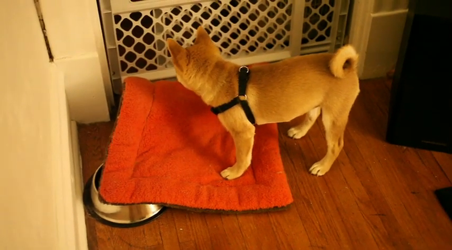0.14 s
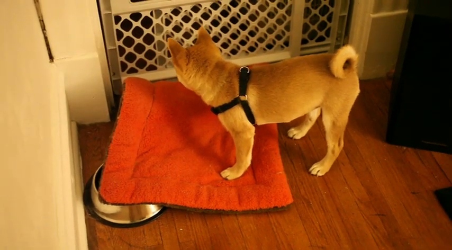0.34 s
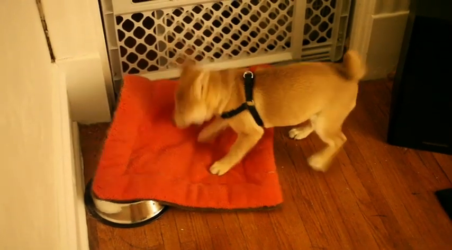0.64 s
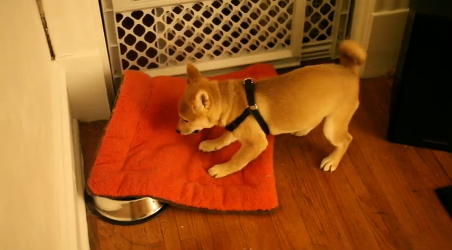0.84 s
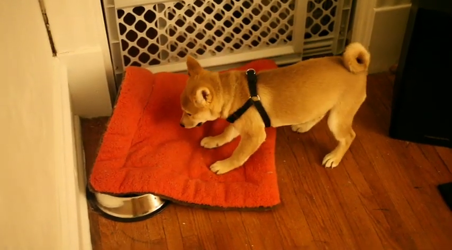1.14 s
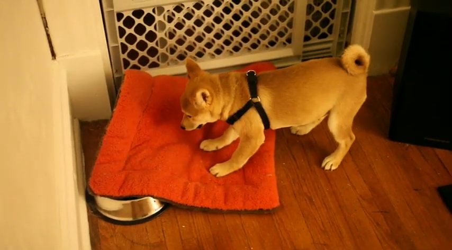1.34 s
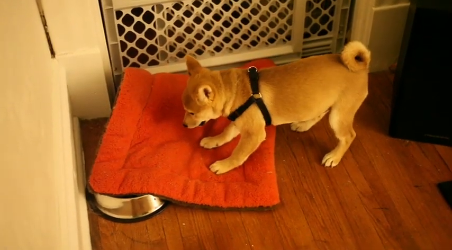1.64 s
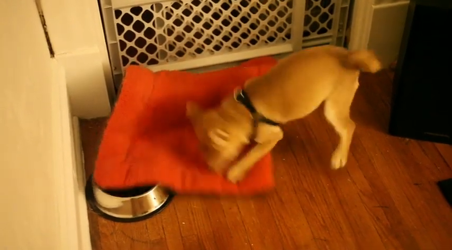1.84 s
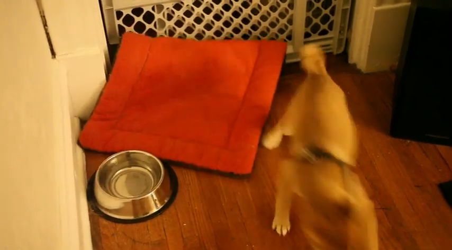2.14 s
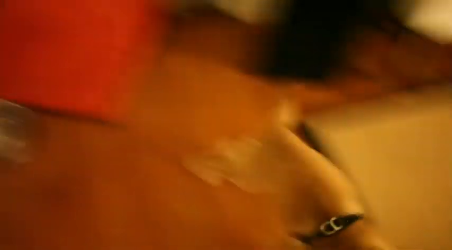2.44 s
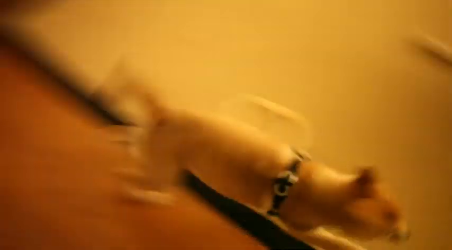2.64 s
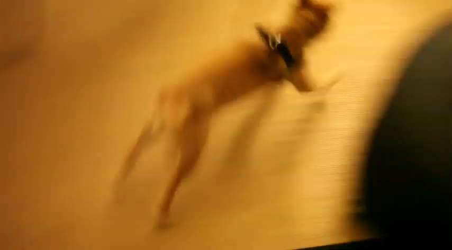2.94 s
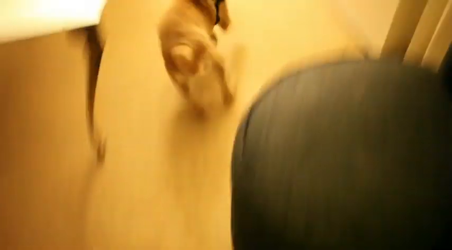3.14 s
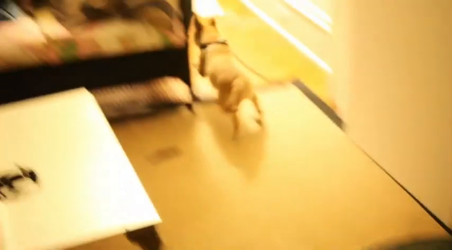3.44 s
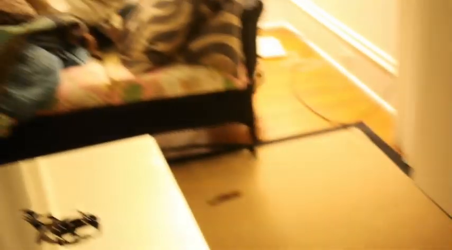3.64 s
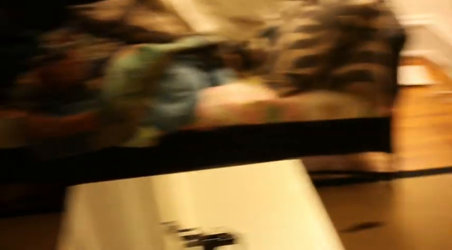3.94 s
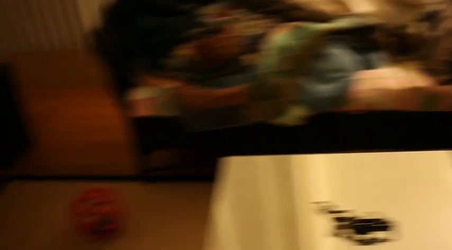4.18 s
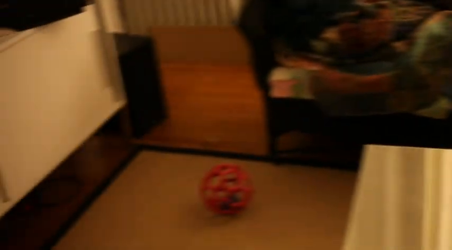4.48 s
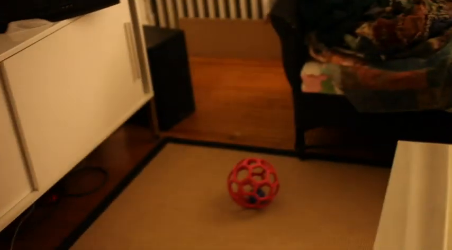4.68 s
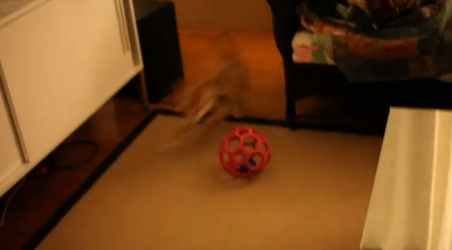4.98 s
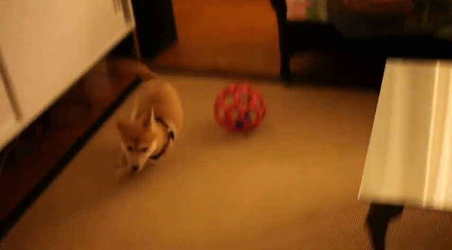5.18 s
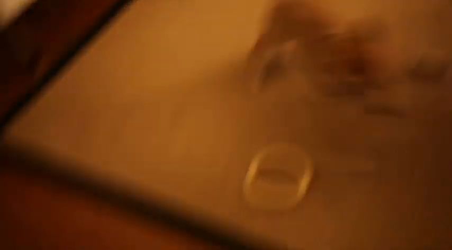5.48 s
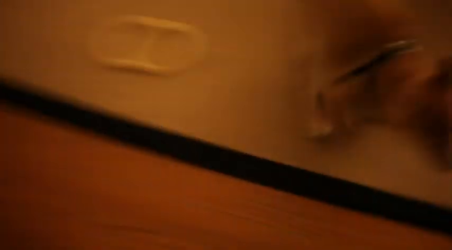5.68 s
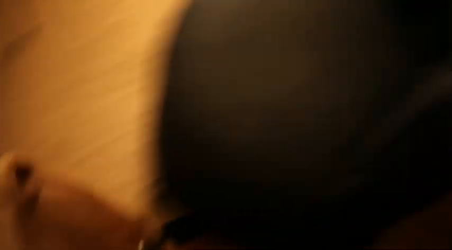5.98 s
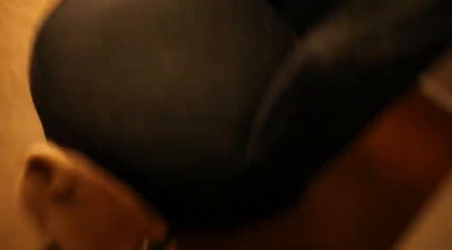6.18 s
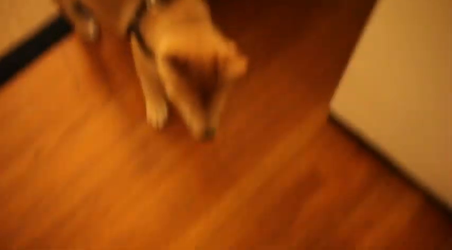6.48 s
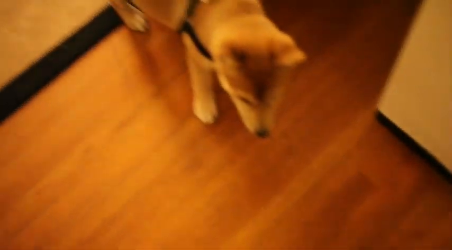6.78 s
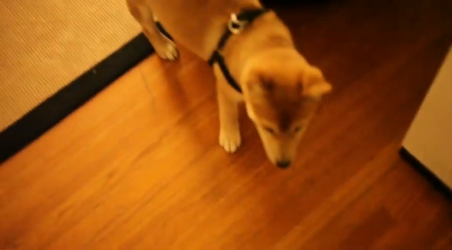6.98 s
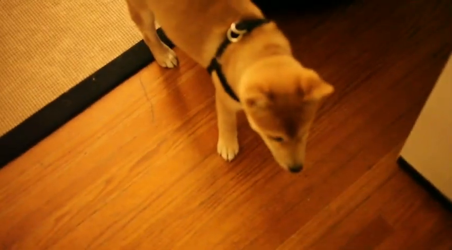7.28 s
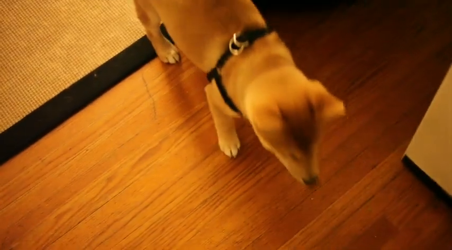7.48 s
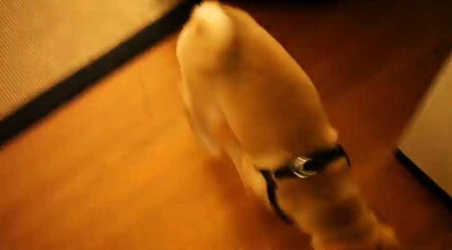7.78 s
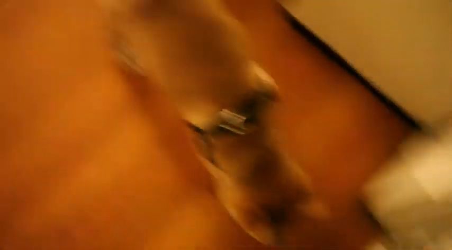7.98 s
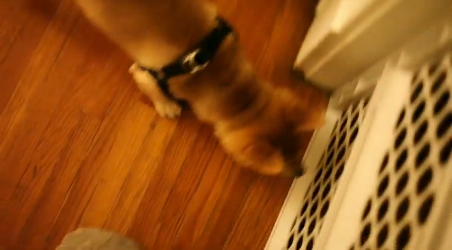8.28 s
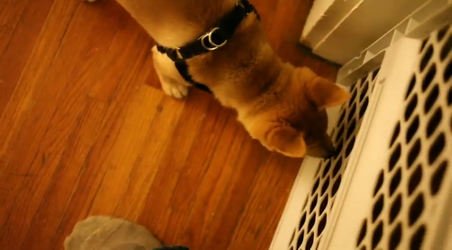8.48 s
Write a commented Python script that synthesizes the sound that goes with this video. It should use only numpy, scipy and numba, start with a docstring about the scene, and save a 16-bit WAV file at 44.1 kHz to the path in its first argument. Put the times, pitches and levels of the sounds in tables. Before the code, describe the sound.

A puppy whimpers faintly, yaps sharply twice, then tears around a small room with claws ticking, skidding and paws thumping, ending in a short snort.

```python
"""Puppy zoomies indoors

A puppy whimpers, yaps twice on its fleece bed, then bolts round a small room near a hand-held camera.
Claws tick as bursts of tiny contacts, paws ring low board modes; skids, hands and rustle are gritty noise.
Yaps are pulsed and noisy folds through moving mouth resonances; a late snort at a gate is air through the nostrils.
Dry jolts shake the camera; eight delay lines answer as walls, over room tone and circuit hiss with thin whines."""
import sys
import numpy as np
from scipy import signal
from scipy.fft import rfft, irfft, next_fast_len
from scipy.io import wavfile
from scipy.ndimage import uniform_filter1d
from numba import njit

SR = 44100
rng = np.random.default_rng(int(sys.argv[2]) if len(sys.argv) > 2 else 0)


def generate_wav(sig):
    """Save sig (samples, or channels by samples) to the path in sys.argv[1] as 16-bit PCM at SR."""
    pcm = np.round(np.clip(np.atleast_2d(sig).T, -1, 1) * 32767).astype(np.int16)
    wavfile.write(sys.argv[1], SR, pcm)


def invert_db(level):
    """Linear amplitude ratio for a level in decibels (20 dB per decade), elementwise."""
    return 10 ** (np.asarray(level, dtype=float) / 20)


N = 380141
TIME = np.arange(N) / SR


def curve(table, off_db=-120):
    """Columns of a table at every sample; off_db outside its time span."""
    s, *columns = np.transpose(table)
    return [np.interp(TIME, s, c, off_db, off_db) for c in columns]


def unit(x):
    """Scale to rms 1."""
    return x / np.sqrt(np.mean(x ** 2))


def colour(x, table):
    """Shape a noise by (Hz, dB) points, then scale to rms 1."""
    hz, db = np.transpose(table)
    size = next_fast_len(N)
    bin_hz = np.arange(size // 2 + 1) * SR / size
    gain = invert_db(np.interp(np.log(bin_hz + 1), np.log(hz), db))
    return unit(irfft(rfft(x, size) * gain, size)[:N])


def band(x, hz, width_hz):
    """A resonance, gain 1 at its centre."""
    return signal.lfilter(*signal.iirpeak(min(hz, .4 * SR), hz / width_hz, SR), x)


@njit
def glide(x, hz, width_hz):
    """A resonance whose centre moves every sample, gain 1 at the centre."""
    y, b, l = np.empty(len(x)), 0., 0.
    for i in range(len(x)):
        g, k = np.tan(np.pi * hz[i] / SR), width_hz / hz[i]
        v = (b + g * (x[i] - l)) / (1 + g * (g + k))
        b, l, y[i] = 2 * v - b, l + 2 * g * v, k * v
    return y


def walk(rate_hz):
    """Random levels held 1 / rate_hz and slewed twice; rms 1."""
    hold = int(SR / rate_hz)
    steps = np.repeat(rng.standard_normal(N // hold + 1), hold)
    return unit(uniform_filter1d(uniform_filter1d(steps, hold), hold)[:N])


def grit(size, spread_db):
    """Dense micro-slips: most small, a few large."""
    return rng.standard_normal(size) * 10 ** (spread_db * np.minimum(rng.exponential(size=size), 7.0) / 20)


def add(out, s, sound):
    """Mix a short sound in at time s."""
    i = int(s * SR)
    out[i:i + len(sound)] += sound[:N - i]


# Hiss and whine level. Each row: time in seconds, level in dB.
HISS_LEVEL = [(0, -63.5), (.6, -61.5), (.66, -71), (1.15, -83.5), (1.7, -72), (1.76, -99.5), (4, -82),
              (6.4, -56.5), (8.62, -57)]
# Hiss spectrum. Each row: frequency in Hz, relative density in dB per Hz.
HISS_SPECTRUM = [(15, -30.5), (25, -2.5), (100, -6), (153, -3.5), (531, -14), (4140, -19), (6920, -20),
                 (16000, -30.5)]
# Thin whines. Each row: frequency in Hz, level in dB relative to the hiss.
WHINES = [(6837, -15), (8791, -23), (9765, -19)]


def hiss():
    """Room tone and circuit hiss with a few thin whines, sinking after each yap and creeping back."""
    whine = sum(invert_db(db) * np.sqrt(2) * np.sin(2 * np.pi * hz * TIME) for hz, db in WHINES)
    noise = colour(rng.standard_normal(N), HISS_SPECTRUM)
    return (noise + whine) * invert_db(curve(HISS_LEVEL, off_db=-60)[0])


# Skids, and from 7.3 to 7.5 s short gritty rasps of hands on the camera. Each row: loudest moment in seconds,
# rasp in dB before a common trim, swell in seconds per 20 dB, fade in seconds per 20 dB,
# scuff in dB relative to that rasp.
RUB_STROKES = [(0.636, -33, 0.065, 0.14, -34), (1.982, -38, 0.032, 0.088, -8),
               (2.208, -42.5, 0.12, 0.3, -3.5), (2.369, -31.5, 0.013, 0.092, -46),
               (2.458, -34, 0.014, 0.09, -15), (2.535, -33.5, 0.087, 0.16, -41),
               (2.712, -26.5, 0.075, 0.12, -12), (2.835, -41.5, 0.025, 0.047, 3.5),
               (2.914, -41, 0.015, 0.1, 4), (3.09, -47, 0.052, 0.28, 4.5), (3.355, -42.5, 0.21, 0.1, 4),
               (3.547, -37.5, 0.062, 1, -6), (3.697, -25, 0.034, 0.16, -11.5),
               (3.85, -34.5, 0.083, 0.37, -34), (4.007, -25, 0.0047, 0.28, -6.5),
               (4.238, -22.5, 0.0049, 0.12, -17), (4.283, -23.5, 0.007, 0.16, -17),
               (4.344, -21.5, 0.011, 0.1, -7), (4.409, -45.5, 0.2, 0.37, 17),
               (4.491, -23.5, 0.027, 0.16, -23), (4.559, -16, 0.026, 0.12, -20),
               (4.722, -28, 0.024, 0.11, -14), (4.82, -26, 0.077, 0.15, -28),
               (4.959, -36.5, 0.35, 0.19, -0.5), (5.195, -36.5, 0.024, 0.13, -3),
               (5.311, -32, 0.16, 0.11, 9), (5.423, -31, 0.066, 0.033, 3), (5.493, -32, 0.048, 0.28, 2),
               (5.76, -32, 0.03, 0.049, 4.5), (5.96, -19, 0.18, 0.14, -6.5), (6.206, -33.5, 0.1, 0.18, -9),
               (7.305, -22, 0.012, 0.025, -3.5), (7.336, -22, 0.012, 0.017, -10),
               (7.38, -25, 0.012, 0.019, -7), (7.482, -28, 0.018, 0.048, -6),
               (7.53, -33.5, 0.093, 0.134, -1), (7.619, -33.5, 0.28, .07, -7),
               (7.732, -29, 0.017, 0.15, -9), (7.983, -33, 0.081, 0.094, -5.5),
               (8.281, -33.5, 0.068, 0.2, -0.5), (8.458, -39.5, 0.39, 0.095, -3)]
# Steady rustle of coat and harness. Each row: time in seconds, level in dB before the same trim.
RUSTLE_LEVEL = [(1.95, -48), (3.3, -53.5), (4.5, -37), (5.15, -81), (6.1, -48.5), (6.5, -54), (7.25, -63),
                (7.35, -40.5), (8.1, -59), (8.5, -40), (8.62, -72.5)]
RUSTLE_DULL_DB = -5.5  # scuff relative to rasp


def strokes():
    """Rasp and scuff levels over time: every stroke swells and fades through 40 dB, on top of the rustle."""
    rasp_power = invert_db(curve(RUSTLE_LEVEL)[0]) ** 2
    scuff_power = rasp_power * invert_db(RUSTLE_DULL_DB) ** 2
    for s, db, swell_s, fade_s, dull_db in RUB_STROKES:
        t = np.arange(-2 * swell_s, 2 * fade_s, 1 / SR)
        power = invert_db(db - 20 * np.maximum(-t / swell_s, t / fade_s)) ** 2
        add(rasp_power, s - 2 * swell_s, power)
        add(scuff_power, s - 2 * swell_s, power * invert_db(dull_db) ** 2)
    return np.sqrt(rasp_power), np.sqrt(scuff_power)


def catches(rate_hz, fade_s):
    """Rubbing catches at random: the level jumps up and dies away; in dB about its mean."""
    hits = (rng.random(N) < rate_hz / SR) * np.minimum(rng.exponential(size=N), 1.6)
    level = signal.lfilter([1], [1, -np.exp(-1 / (fade_s * SR))], hits) + 0.24
    level_db = 20 * np.log10(uniform_filter1d(level, size=40))
    return level_db - level_db.mean()


# Rasp spectrum. Each row: frequency in Hz, relative density in dB per Hz.
RASP_SPECTRUM = [(1410, -16), (2400, -9.5), (3740, 3.5), (4460, 5.5), (5520, -2), (6630, 0.5), (9630, -6),
                 (16000, -36.5)]
# Scuff spectrum. Each row: frequency in Hz, relative density in dB per Hz.
SCUFF_SPECTRUM = [(240, -67), (400, -6), (1170, -2), (1860, -2.5), (2230, -4), (3050, 4), (3600, -2.5),
                  (4500, -0.5), (7920, -47)]
# Fine crackle in the top treble, strongest around 0.6 and 7.4 s, weak in between.
# Each row: time in seconds, level in dB relative to the rasp.
TOP_CRACKLE = [(.6, -10.5), (2.3, -23), (5.3, -39), (6.3, -32), (7.4, -4), (8.3, -52.5)]


def scrape():
    """Skids, hands and rustle rub in fits: a bright rasp over a duller scuff; louder strokes stutter most."""
    bright, dull = strokes()
    depth = np.clip((20 * np.log10(bright) + 64) / 18, 0, 1)  # 0-1, from loudness
    stutter_db = depth * 0.46 * catches(rate_hz=70, fade_s=0.0095)
    rasp = colour(grit(N, spread_db=3.1), RASP_SPECTRUM)
    scuff = colour(grit(N, spread_db=2.26), SCUFF_SPECTRUM)
    # bands come and go separately, so the colour keeps shifting
    rasp = unit(sum(band(rasp, f, f / 2) * invert_db(stutter_db + 2.036 * depth * walk(45))
                    for f in np.geomspace(2000, 13000, num=5)))
    scuff = unit(sum(band(scuff, f, f / 2) * invert_db(stutter_db + 3.66 * walk(18))
                     for f in np.geomspace(550, 4600, num=6)))
    crackle = unit(band(band(grit(N, spread_db=4.0), 11000, 7000), 11000, 7000))
    crackle = crackle * invert_db(np.interp(TIME, *np.transpose(TOP_CRACKLE)))
    # lone thin clicks, 45 per s on average
    nicks = (rng.random(N) < 45 / SR) * grit(N, spread_db=4.0)
    nicks = invert_db(-9) * unit(band(signal.lfilter([1], [1, .6], nicks), 7000, 9000))
    return invert_db(-5.5) * bright * (rasp + crackle + nicks) + dull * scuff


# Two yaps, then the faint whimper heard before them. Each row of a voice: time in seconds, pitch in Hz,
# level in dB, roughness 0-1, growl depth 0-1.
VOICES = [
    [(.621, 1450, -42, .5, 0), (.628, 1420, -3, .4, .4), (.638, 1300, -9, .1, .1),
     (.651, 1370, -12, .03, 0), (.656, 1360, -19, .3, 0), (.678, 1390, -12, .55, .3),
     (.696, 1350, -23, .85, 0), (.705, 1350, -60, .7, 0)],
    [(1.708, 1300, -55, .6, 1), (1.73, 1320, -34, .6, .9), (1.742, 1350, -12, .4, .9),
     (1.762, 1350, -11, .4, .9), (1.768, 1050, -17, .7, .3), (1.79, 1010, -14, .4, .1),
     (1.85, 870, -25, .45, .1), (1.93, 830, -44, .4, .1)],
    [(.531, 600, -60, .6, 0), (.538, 600, -43, .4, 0), (.58, 600, -49, .3, 0), (.615, 600, -56, .3, 0)],
]
# Jaw of each voice. Each row: darkening in dB per second and octave above 1 kHz (negative brightens),
# sinking of the resonances as a share per second (negative rises).
JAW_MOVES = [(-28.5, -0.18), (39, 0.17), (57, 0)]
# Open mouth of each voice. Each row of a mouth: resonance in Hz, width in Hz, gain in dB.
MOUTH_RESONANCES = [
    [(930, 220, -6.5), (1360, 720, -1), (1965, 470, -1), (2600, 560, -8.5), (3360, 570, -12.5),
     (4140, 578, -15), (6520, 1400, -29)],
    [(332, 230, -27.5), (934, 290, -9), (1366, 270, -2), (1950, 290, 4.5), (2580, 370, -2), (3380, 520, -3),
     (4330, 300, -7.5), (6640, 2700, -15.5)],
    [(1200, 500, -7), (1760, 250, 0)],
]
GROWL_HZ = 147


def yaps():
    """Vocal folds snap shut once a cycle, breath roughens them, a slower flap chops them into a growl."""
    out = np.zeros(N)
    for table, mouth, (darkening, sinking) in zip(VOICES, MOUTH_RESONANCES, JAW_MOVES):
        span = slice(int(table[0][0] * SR), int(table[-1][0] * SR))
        hz, db, rough, growl = (c[span] for c in curve(table))
        rough, growl = np.clip(rough, 0, 1), np.clip(growl, 0, 1)
        phase = np.cumsum(hz * (1 + 0.2 * rough * walk(600)[span])) / SR
        folds = sum(np.cos(2 * np.pi * k * phase) / k ** 1.2 for k in range(1, 6))
        source = (1 - rough) * folds + 3.6 * rough * rng.standard_normal(len(hz))
        flap = unit(np.exp(np.cos(2 * np.pi * GROWL_HZ * (TIME[span] - 1.745))))
        source = source * (1 - growl + growl * flap)
        t = TIME[:len(hz)]
        sink = np.exp(-sinking * t)
        voiced = np.zeros(len(hz))
        for k, (f, width_hz, gain_db) in enumerate(mouth):
            resonance = glide(glide(source, f * sink, 1. * width_hz), f * sink, 2. * width_hz)
            tilt_db = darkening * t * np.log2(f / 1000)
            voiced += (-1) ** k * invert_db(gain_db - tilt_db) * resonance
        out[span] = unit(voiced) * invert_db(db)
    return out


# Claw strikes. Each row: hardest contact in seconds, peak in dB before the housing, centre in Hz.
CLAW_STRIKES = [(0.532, -34.5, 1200), (0.587, -22.5, 4230), (1.95, -21.5, 4330), (1.967, -11, 4440),
                (2.119, -14.5, 5140), (2.362, -11, 4500), (2.453, -21, 5930), (2.528, -14.5, 5350),
                (2.602, -18, 3330), (2.908, -24, 2530), (3.077, -20, 1720), (3.268, -26, 1880),
                (3.799, -16, 5400), (4.01, -6, 4300), (4.237, -27, 5130), (4.387, -6, 1880),
                (4.399, -14, 1610), (4.414, -16.5, 1020), (4.487, -16.5, 6380), (4.554, -11.5, 5400),
                (4.726, -16.5, 6100), (4.813, -10, 5270), (5.239, -17, 2870), (5.28, -16, 2900),
                (5.307, -13, 1930), (5.403, -28, 4500), (5.486, -14.5, 1930), (5.604, -20, 1020),
                (5.907, -14, 3300), (6.155, -14.5, 5160), (6.189, 1, 3660), (7.089, -25.5, 1190),
                (7.241, -27.5, 1260), (7.284, -15, 5100), (7.427, -13, 4500), (7.525, -14.5, 5660),
                (7.744, -15, 4860), (7.767, -18.5, 5800), (7.939, -20.5, 4860), (7.989, -16.5, 3900),
                (8.0102, -9.5, 5660), (8.016, -10.5, 5700), (8.061, -0.5, 4150), (8.188, -22.5, 5300),
                (8.224, -25, 3020), (8.252, -6, 3720), (8.402, -17, 5700), (8.564, -18, 6800)]
CLAW_CONTACT_S = 0.0026  # typical decay for a 4 kHz strike


def claws():
    """Each claw is a burst of tiny contacts; duller blows last longer and make the wood ring at their pitch."""
    out, t = np.zeros(N), TIME[:4096]
    lead = 40  # samples of light brushing before the hardest contact
    for s, db, hz in CLAW_STRIKES:
        dull = 4000 / hz
        contact_s = CLAW_CONTACT_S * dull ** .2 * np.exp(0.25 * rng.standard_normal())
        grains = unit(grit(len(t), spread_db=3.27))
        grains[:lead] *= invert_db(-17.5)
        grains[lead] = 8
        slips = grains * (np.exp(-t / contact_s) + invert_db(-21.5) * dull ** .5 * np.exp(-t / 0.026))
        tick = band(band(slips, hz, min(2.0 * hz, .4 * SR)), hz, 1.15 * hz)
        tick = tick + invert_db(-31.5) / dull ** 2 * band(slips, 11000, 9000)
        wood = invert_db(-12.5) * dull * band(grains * np.exp(-t / 0.01), hz, 0.1 * hz)
        wood = wood + invert_db(-5.5) * band(slips, 1100, 800)
        strike = tick + wood
        add(out, s - lead / SR, strike * invert_db(db) / np.abs(strike).max())
    return out


# Paw falls; the first row is the low breath puff at the first yap's onset.
# Each row: start in seconds, peak in dB, pitch in Hz.
LOW_THUMPS = [(0.621, -36, 170.4), (1.971, -29.5, 143), (2.372, -34, 142), (2.765, -25.5, 169.3),
              (2.88, -27.5, 191.3), (2.917, -23, 167.5), (3.021, -31, 163.4), (3.15, -30, 160),
              (3.185, -31, 163), (3.269, -23, 174), (3.378, -31, 166), (3.454, -25.5, 160),
              (3.537, -26, 173), (3.801, -34, 176), (4.057, -34, 211), (4.123, -35, 161), (4.382, -24, 164),
              (4.732, -25, 201), (4.859, -33, 162), (5.043, -31, 152.6), (5.096, -30, 256.5),
              (5.253, -28, 250), (5.349, -26, 160.5), (5.487, -26, 231), (5.602, -31.5, 127),
              (5.641, -27.5, 158.6), (5.744, -24, 255), (5.84, -23.5, 165), (5.952, -21.5, 195.5),
              (6.07, -35.5, 172), (6.356, -41, 198.7), (6.684, -38, 175.4), (7.245, -32.5, 264),
              (8.427, -40, 191)]
# Board modes. Each row: multiple of the pitch, mean level in dB, t60 in seconds.
BOARD_MODES = [(1.002, 1, 0.13), (1.451, 1, 0.041), (2.1, -20.5, 0.24)]
# Trembling floor. Each row: time in seconds, level in dB.
TREMBLE_LEVEL = [(1.95, -62), (5.79, -39.5), (6.52, -67.5), (8.62, -46)]
# Tremble spectrum. Each row: frequency in Hz, relative density in dB per Hz.
TREMBLE_SPECTRUM = [(15, -57), (25, -5), (70, -10.5), (167, 4.5), (395, -4.5), (461, -9.5), (700, -14.5),
                    (1540, -120)]


def paws():
    """Pads ring the boards on low modes, with rattle and slap (also used for one breath puff); the floor trembles."""
    out, t = np.zeros(N), TIME[:8192]
    for s, db, hz in LOW_THUMPS:
        ring = np.zeros(len(t))
        for multiple, mode_db, t60_s in BOARD_MODES:
            level = invert_db(mode_db + 4.1 * rng.standard_normal())
            ring += level * np.sin(2 * np.pi * multiple * hz * t) * np.exp(-np.log(1000) * t / t60_s)
        rattle = unit(band(band(rng.standard_normal(len(t)), 260, 120), 350, 250)) * np.exp(-t / 0.016)
        slap = unit(band(rng.standard_normal(len(t)), 600, 350)) * np.exp(-t / 0.02)
        thump = ring + invert_db(-12.0) * rattle + invert_db(-19.5) * slap
        thump = thump * (1 - np.exp(-t / .0028)) ** 2  # soft onset
        add(out, s, thump * invert_db(db) / np.abs(thump).max())
    tremble = unit(colour(rng.standard_normal(N), TREMBLE_SPECTRUM) * invert_db(4.03 * walk(14)))
    return out + tremble * invert_db(curve(TREMBLE_LEVEL)[0])


# Jolts of the hand-held camera. Each row: start in seconds, peak in dB.
CAMERA_JOLTS = [(7.239, -28.5), (7.274, -29), (7.302, -25), (7.341, -27.5), (7.381, -28.5), (7.427, -30),
                (7.472, -30.5), (7.52, -11.5), (8.057, -27.5)]


def bumps():
    """Dry low jolts through the camera body: one swing and gone, each at a slightly different speed."""
    out = np.zeros(N)
    for s, db in CAMERA_JOLTS:
        t = TIME[:1024] * np.exp(0.12 * rng.standard_normal())
        swing = np.sin(2 * np.pi * 200 * t) + invert_db(-6) * np.sin(2 * np.pi * 400 * t)
        swing = swing + invert_db(-12.0) * np.sin(2 * np.pi * 740 * t)
        swing = swing * t ** 2 * np.exp(-t / 0.0015)
        add(out, s, swing * invert_db(db) / np.abs(swing).max())
    return out


# Snort. Each row: time in seconds, level in dB.
SNORT_LEVEL = [(8.258, -79), (8.27, -31.5), (8.288, -22), (8.33, -25.5), (8.37, -36.5), (8.39, -63)]
# Nostril resonances. Each row: centre in Hz at the snort's loudest, width in Hz, gain in dB.
NOSTRILS = [(1770, 390, -11), (2900, 200, -5.5), (4230, 510, 7), (6100, 750, -6), (7250, 440, -9.5)]


def snort():
    """Air blown through the nostrils, fluttering; their resonances wander and sink as the nose relaxes."""
    out = np.zeros(N)
    span = slice(int(SNORT_LEVEL[0][0] * SR), int(SNORT_LEVEL[-1][0] * SR))
    air = (rng.standard_normal(N) * invert_db(3.0 * walk(150)))[span]
    sink = np.exp(-0.6 * (TIME[span] - SNORT_LEVEL[2][0]))
    blown = np.zeros(len(air))
    for f, width_hz, gain_db in NOSTRILS:
        hz = f * sink * (1 + 0.023 * walk(60)[span])
        blown += invert_db(gain_db) * glide(glide(air, hz, 1. * width_hz), hz, 1. * width_hz)
    out[span] = unit(blown)
    return out * invert_db(curve(SNORT_LEVEL)[0])


@njit
def walls(x, lags, gain, damp):
    """Eight delay lines that feed each other, duller on every round."""
    line, soft, out = np.zeros((8, 4096)), np.zeros(8), np.zeros(len(x))
    for i in range(len(x)):
        total = 0.
        for k in range(8):
            soft[k] += (1 - damp) * (gain[k] * line[k, (i - lags[k]) & 4095] - soft[k])
            total += soft[k]
            out[i] += soft[k] * (1 - 2 * (k % 2))
        for k in range(8):
            line[k, i & 4095] = x[i] + soft[k] - total / 4
    return out


ROOM_T60_S, ROOM_DAMP = 0.38, 0.18  # t60 before damping
# Microphone housing. Each row: centre in Hz, width in Hz, added resonance in dB.
HOUSING = [(1852, 474, 8.5), (6384, 1650, 3)]


def scene():
    """Puppy and camera handling with the room's answer, camera jolts and hiss."""
    voice, ticks, thumps = yaps(), claws(), paws()
    rubbing = scrape() + snort()
    lags = np.array([397, 563, 719, 887, 1069, 1277, 1493, 1733])  # samples
    sends = invert_db(-16.5) * voice + invert_db(-30) * ticks + invert_db(-13.5) * thumps + invert_db(-22.0) * rubbing
    room = walls(sends + 1e-18, lags, invert_db(-60 * lags / SR / ROOM_T60_S), ROOM_DAMP)
    # the housing lifts a few bands of broad sounds
    broad = ticks + rubbing
    broad = invert_db(-2.0) * (broad + sum(invert_db(db) * band(broad, hz, width_hz) for hz, width_hz, db in HOUSING))
    return (voice + broad + thumps + bumps() + room + hiss())[None]


def band_limit(x):
    """A steep low-pass at the top of the band."""
    return signal.sosfilt(signal.butter(12, 17030, fs=SR, output="sos"), x)


def record(dry):
    """A small microphone loses the deepest bass and the top; peaks above full scale are clipped."""
    heard = signal.sosfilt(signal.butter(2, [45, 15000], "band", fs=SR, output="sos"), dry)
    mix = np.clip(heard, -1, 1)
    return band_limit(mix)


dry = scene()
out = record(dry)
generate_wav(out)
```